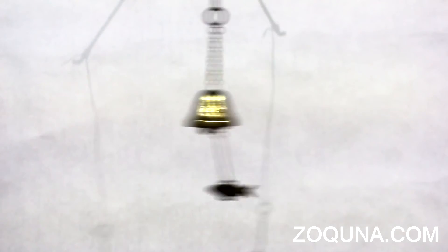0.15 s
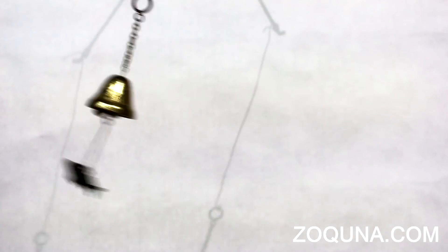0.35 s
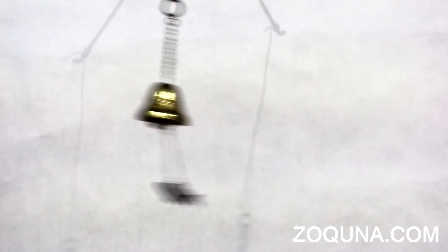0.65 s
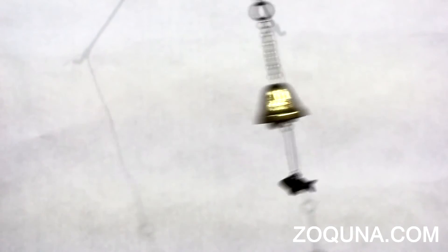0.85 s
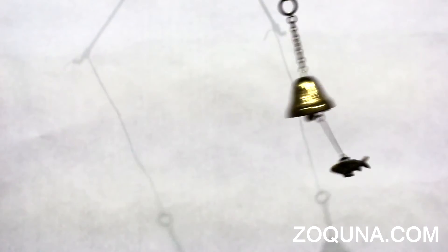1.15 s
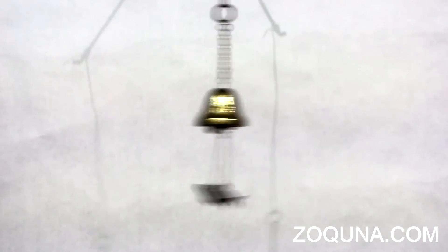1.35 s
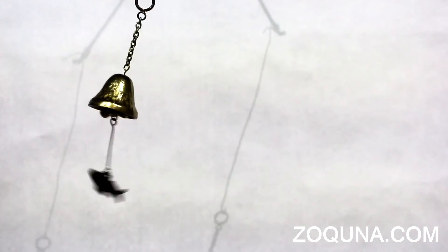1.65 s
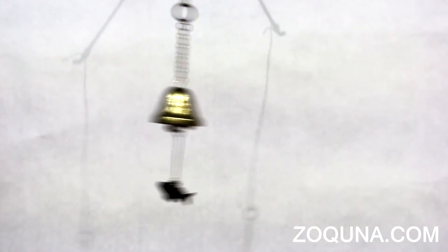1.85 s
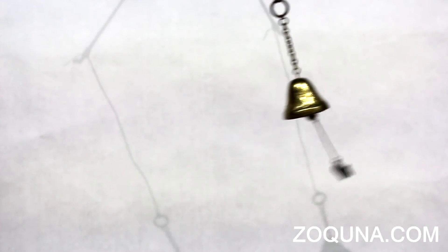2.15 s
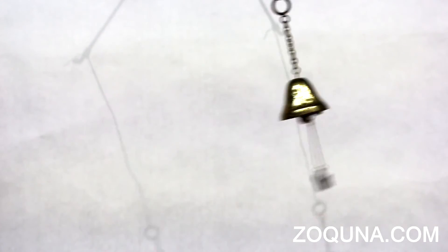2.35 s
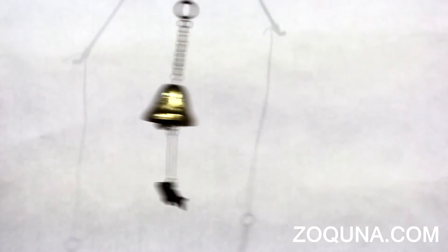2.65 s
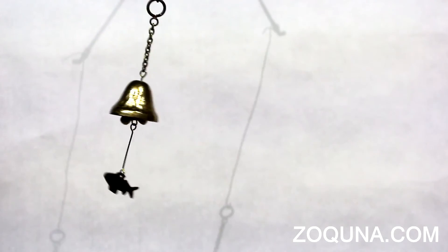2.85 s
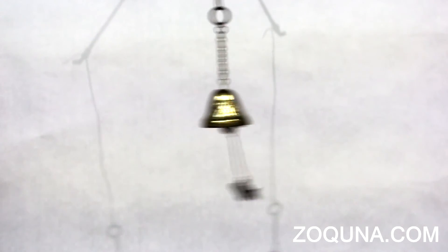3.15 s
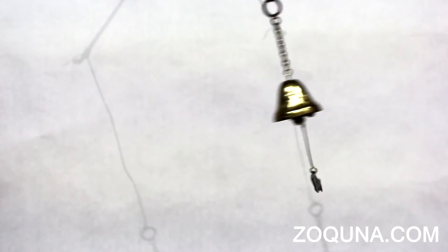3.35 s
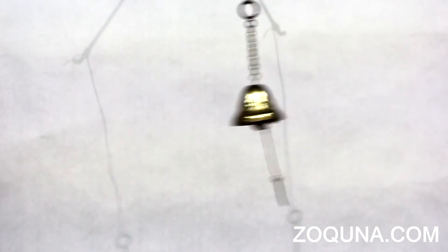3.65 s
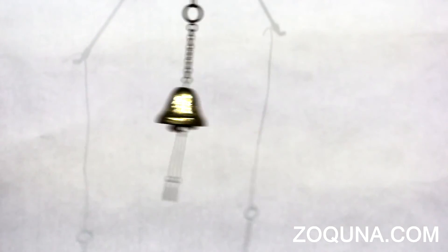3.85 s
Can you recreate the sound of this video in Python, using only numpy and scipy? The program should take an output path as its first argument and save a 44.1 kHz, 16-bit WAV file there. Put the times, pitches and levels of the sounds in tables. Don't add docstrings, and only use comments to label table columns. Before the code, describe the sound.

A little hanging bell is struck repeatedly, its thin high ring wavering over soft hiss

```python
import sys
import numpy as np
from scipy import signal
from scipy.fft import rfft, irfft, next_fast_len
from scipy.io import wavfile
from scipy.ndimage import uniform_filter1d, map_coordinates

SR = 44100
rng = np.random.default_rng(int(sys.argv[2]) if len(sys.argv) > 2 else 0)


def undo_db(level):
    steps = np.asarray(level, float) / 20
    return 10 ** steps


def generate_wav(sig):
    pcm = np.round(np.clip(np.atleast_2d(sig).T, -1, 1) * 32767).astype(np.int16)
    wavfile.write(sys.argv[1], SR, pcm)


N = 176400

# (time [s], low tone [dB], high tone [dB], low overtone [dB], high overtone [dB])
BLOWS = [
    (-.02, -17, -24, -38.5, -44.5),
    (0.7533, -21, -30, -27.5, -29),
    (1.249, -31, -34, -39, -39),
    (2.2723, -65.5, -36, -72, -58),
    (3.2837, -45.5, -53, -71, -68),
]


def unit(x):
    return x / np.sqrt(np.mean(x ** 2) + 1e-20)


def along(points, hz):
    f, v = np.transpose(points)
    return np.interp(np.log(hz + 1), np.log(f + 1), v)


def filtered(x, response):
    m = next_fast_len(N + SR // 2)
    spectrum = rfft(x, m) * response(np.fft.rfftfreq(m, 1 / SR))
    return irfft(spectrum, m)[..., :N]


def closed(points):
    return lambda hz: undo_db(along(points, hz)) / (1 + (points[0][0] / (hz + 1)) ** 14)


def resonance(center, width):
    return lambda f: (1j * f * width / (center * center - f * f + 1j * f * width)) ** 2


def noise(response):
    # (frequency [Hz], share [0-1])
    side_share = [(60, .06), (180, 0.24), (350, 0.47), (700, 0.72), (3000, 0.51), (14000, 0.67)]

    def mid_side(hz):
        share = np.clip(along(side_share, hz), 0, 1)
        return response(hz) * np.sqrt([1 - share, share])

    mid, side = filtered(rng.standard_normal((2, N)), mid_side)
    return unit(np.array([mid + side, mid - side]))


def wobble(rate):
    knots = rng.standard_normal(int(N * rate / SR) + 4)
    return map_coordinates(knots, [np.arange(N) * rate / SR])


def room():
    # (frequency [Hz], level [dB])
    air_curve = [(21, -32), (35, -8.5), (76, -7.5), (108, -4.5), (280, -7.5), (600, -12.5), (780, -55),
                 (1320, -120)]
    # (frequency [Hz], level [dB])
    hiss_curve = [(400, -12), (600, 1.5), (1500, -3.5), (3300, -4.5), (4500, -9), (8000, -12.5),
                  (12000, -17), (15800, -22)]
    # (frequency [Hz], width [Hz], level [dB])
    hums = [
        (44, 10, -65.5),
        (65.7, 9.9, -62.5),
        (277.55, 6.9, -63.5),
    ]
    # (frequency [Hz], level [dB])
    right_db = [(40, -1.5), (2000, 0), (14000, 0.3)]

    air = noise(lambda hz: closed(air_curve)(hz) / (1 + (hz / 600) ** 8))
    hiss = noise(closed(hiss_curve))
    bed = undo_db(-57.5 + wobble(7.5)) * air + undo_db(-55.5 + 0.29 * wobble(12)) * hiss
    for hz, width, db in hums:
        bed += undo_db(db) * noise(resonance(hz, width))
    return filtered(bed, lambda hz: undo_db(np.outer([-.5, .5], along(right_db, hz))))


def stand():
    # (time [s], rise [s], t60 [s], rustle [dB], knock [dB])
    scuffs = [(.17, .05, .5, -58.5, -74), (1.701, 0.013, .15, -51.5, -71.5), (1.86, .09, 0.43, -42.5, -62),
              (1.985, .012, .25, -48, -68), (2.019, 0.056, 0.39, -49, -69.5),
              (2.553, 0.026, 0.41, -39.5, -45), (2.84, 0.074, 0.81, -51.5, -65),
              (2.89, 0.032, 0.76, -58, -54.5), (3.698, 0.0096, 0.28, -46.5, -67)]
    # (frequency [Hz], level [dB])
    rustle_curve = [(400, -7.5), (1400, -6.5), (2800, -3.5), (3500, 2.5), (4500, -11.5), (7000, -25.5),
                    (13000, -32)]
    # (frequency [Hz], width [Hz], level [dB])
    hollows = [(159, 180, -5.5), (299, 17, -13), (418.6, 81, -3.5)]
    # (time [s], length [s], frequency [Hz], width [Hz], level [dB])
    squeaks = [
        (2.3, .33, 3230, 110, -54.5),
        (3.7, .04, 3400, 400, -53),
    ]
    # (time [s], length [s], frequency [Hz], level [dB])
    creaks = [
        (-.01, 0.081, 1592, -59.5),
        (.8, .08, 1550, -64.5),
    ]

    t, out = np.arange(N) / SR, np.zeros((2, N))
    grain = undo_db(0.63 * wobble(300) + .6 * wobble(33))
    rustle = unit(noise(closed(rustle_curve)) * grain)
    knock = np.zeros((2, N))
    for hz, width, db in hollows:
        drift = np.array([wobble(width), wobble(width)])
        knock += undo_db(db) * np.sin(2 * np.pi * hz * t + drift)
    knock = unit(knock)

    for s, rise, t60, rustle_db, knock_db in scuffs:
        u = np.maximum(t - s, 0)
        shape = np.minimum(u / rise, 1) ** 2 * undo_db(-60 * np.maximum(u - rise, 0) / t60)
        out += shape * (undo_db(rustle_db) * rustle + undo_db(knock_db) * knock)
    for s, length, hz, width, db in squeaks:
        shape = np.clip(np.minimum(t - s, s + length - t) / 0.005, 0, 1)
        out += shape * undo_db(db + 3.5 * wobble(60)) * noise(resonance(hz, width))
    for s, length, hz, db in creaks:
        shape = np.clip(np.minimum(t - s, s + length - t) / .015, 0, 1)
        out += shape * undo_db(db + 1.5 * wobble(30)) * np.sin(2 * np.pi * hz * t + .4 * wobble(30))
    return out


def clapper():
    # (click [dB], bright edge [dB], top modes [dB])
    clicks = [
        (-31.5, -37, -24.5),
        (-34.5, -48.5, -59),
        (-42.5, -61, -66),
        (-47, -67, -72),
    ]
    # (frequency [Hz], level [dB], t60 [s])
    top_modes = [(10310, -3, 0.048), (11300, -19, .06), (14725, -26, 0.13), (15510, -27, .17)]
    # (frequency [Hz], level [dB])
    click_curve = [(1700, -18), (2400, -6.5), (3300, -4.5), (4100, 0.5), (5000, -14), (7000, -45)]
    # (frequency [Hz], level [dB])
    edge_curve = [(5000, -6.5), (7500, 1), (9500, 0), (12500, -14), (15500, -30)]
    click_t60_s, room_t60_s, room_db = .012, 0.16, -11
    rebound_s, rebound_db = .0042, -2

    t, out = np.arange(N) / SR, np.zeros((2, N))
    for (s, *_), (click_db, edge_db, top_db) in zip(BLOWS[1:], clicks):
        u = np.maximum(t - s, 0)
        tick = undo_db(-60 * u / click_t60_s)
        tick += (u > rebound_s) * undo_db(rebound_db - 60 * abs(u - rebound_s) / click_t60_s)
        tick += undo_db(room_db - 60 * u / room_t60_s)
        click = undo_db(click_db) * noise(closed(click_curve)) + undo_db(edge_db) * noise(closed(edge_curve))
        ring = np.zeros((2, N))
        for hz, db, t60 in top_modes:
            ring += undo_db(db - 60 * u / t60) * np.sin(2 * np.pi * (hz * u + rng.random((2, 1))))
        onset = 1 - np.exp(-u / 0.00073)
        out += (t > s) * (tick * click + undo_db(top_db) * ring * onset)
    return out


def lobes(nodes, t):
    inertia_s, squareness = .04, 0.79
    s, *cols = np.transpose(nodes)

    def glide(values):
        return uniform_filter1d(np.interp(t, s, values), round(inertia_s * SR))

    swing = np.tanh(squareness * np.sin(np.pi * glide(np.arange(len(s))))) / np.tanh(squareness)
    lobe = np.searchsorted(s[1:-1], t)
    size = undo_db([uniform_filter1d(db[lobe], round(2 * inertia_s * SR)) for db in cols[:2]])
    fill = 0.47
    if len(cols) > 2:
        fill = np.array([glide(c) for c in cols[2:]])
    return size * (swing + 1j * fill * (1 - swing ** 2))


def bell():
    # (frequency [Hz], t60 [s])
    modes = [
        (3967, 2.83),
        (3997, 1.997),
        (9026, 0.96),
        (9060, 0.98),
    ]
    # (time [s], next lobe left
    # [dB], right [dB], room fill left [0-1], right [0-1])
    nodes_low = [(-0.08, -5, -15, 0.2, 0.7), (0.05, -2, -0.5, 1, 0.08), (0.209, 1, -8.5, 0.19, 0),
                 (0.43, 1, -8, 0.4, 0), (0.651, 1.5, 6.0, 0.68, 0), (0.799, 4, 6.5, 0.14, 0.42),
                 (0.909, 4, -1.5, 0.1, 1), (1.066, -28, 1, 0.6, 0), (1.207, 6.5, 5.5, 1, 0.5),
                 (1.341, 4, 9.5, 0.38, 0.47), (1.492, -4.5, 4, 0.4, 0.46), (1.632, 0, -6.5, 0.26, 0.8),
                 (1.782, 6.5, 11, 0.15, 0.8), (1.959, 7, 7.5, 0.74, 0.3), (2.073, 10.5, 12.5, 0, 0),
                 (2.272, 7, 12, 1, 0.8), (2.7, 4, 25.5, 0.1, 0.05), (3.285, 5.5, -8, 0.8, 0.8),
                 (3.39, 5.5, 9, 0.3, 0.9), (3.75, 6.5, -14, 1, 0.3), (4.0, 0.0, 0.0, 0.57, 0.05)]
    nodes_high = [(-0.05, -2, 3, 0.3, 0.3), (0.06, 7, -4, 0.21, 0.6), (0.172, 3.5, 7.5, 0.67, 0.31),
                  (0.33, 7.5, 12.5, 0.31, 0.41), (0.7, 4.5, -7.5, 0.27, 0.54), (0.86, -1, 8, 0.81, 0.29),
                  (1.05, 3, 5, 0.09, 0.14), (1.249, 1, -4.0, 0.66, 0.56), (1.41, 3.0, -1.5, 1, 0.27),
                  (1.608, -8, 6, 0.05, 0.26), (1.85, 2, 13, 1, 1), (2.13, -9, -26, 0.18, 0.19),
                  (2.276, 4.5, 6.5, 0.26, 0.19), (2.523, -2, -0.5, 0.16, 1), (2.637, 7, 12.5, 0.58, 0.059),
                  (2.95, 1, 14, 0.45, 0.98), (3.285, -3, 12.5, 1, 0.4), (3.7, 5, 18, 0.85, 0.68),
                  (3.85, 20.5, 10, 0.12, 0.28), (4.1, 0.0, 0.0, 0.3, 0.3)]
    # (time [s], next lobe left [dB], right [dB])
    nodes_over_low = [(-0.05, -26, 3.5), (0.05, -6.5, 4.5), (0.15, 0.5, 6), (0.258, -13, -0.5),
                      (0.399, -13, -19), (0.74, 3.5, 4.5), (0.818, -14.5, 1), (0.932, 6, -2.5),
                      (1.03, 4.5, 4), (1.24, 0.5, -6), (1.352, -8, -3.5), (1.45, -5.5, -1.5),
                      (1.55, -15, -27), (1.8, 0.0, 0.0)]
    nodes_over_high = [(-0.05, 1, -5), (0.101, -11, -6.5), (0.199, 1.5, -2.5), (0.74, 1, -5.5),
                       (0.86, -5, -18), (1.001, -9.5, -7.5), (1.11, -14, -27), (1.24, -3, -22),
                       (1.328, -4.5, 0.5), (1.41, -19, -12), (1.5, 0, 4.0), (1.63, -2, -13), (2.26, -6, -8),
                       (2.33, 5, -2), (2.48, 6, 6), (3.27, 4, 9.5), (3.4, -10, -7), (3.6, 0, 0)]
    all_nodes = [nodes_low, nodes_high, nodes_over_low, nodes_over_high]
    rise_s, port_lag_rad = 0.0032, 0.49

    t, out = np.arange(N) / SR, np.zeros((2, N))
    s, *levels = np.transpose(BLOWS)
    last = np.searchsorted(s, t, "right") - 1
    lag = np.exp(1j * port_lag_rad * np.array([[.5], [-.5]]))
    for (hz, t60), db, nodes in zip(modes, levels, all_nodes):
        phase = np.exp(2j * np.pi * rng.random(len(s)))
        state = undo_db(db[last] - 60 * (t - s[last]) / t60) * phase[last]
        hold = np.exp(-hz / modes[0][0] / (rise_s * SR))
        state = signal.lfilter([1 - hold], [1, -hold], state, zi=[state[0] * hold])[0]
        out += np.imag(state * lobes(nodes, t) * lag * np.exp(2j * np.pi * hz * t))
    return out


def scene():
    return room() + stand() + clapper() + bell()


def masked(x):
    # (frequency [Hz], threshold under the tone [dB], slope [dB per kHz])
    masks = [
        (3980, -33, -11),
        (9040, -30, -6),
    ]
    hz, _, z = signal.stft(x, SR, nperseg=1024)
    level = np.sqrt(uniform_filter1d(abs(z) ** 2, size=8, axis=1) + 1e-20)
    for tone_hz, under_db, slope_db in masks:
        tone = abs(z[:, abs(hz - tone_hz) < 100]).max(axis=1, keepdims=True)
        above = (hz - tone_hz)[:, None]
        audible = level > tone * undo_db(under_db + slope_db * above / 1000)
        z = z * (audible | (above < 250))
    return signal.istft(z, SR, nperseg=1024)[1][:, :N]


def band_limit(x):
    return signal.sosfilt(signal.butter(12, 15820, fs=SR, output="sos"), x)


def record(dry):
    band = filtered(dry, lambda hz: hz < 15760)
    return band_limit(masked(band))


dry = scene()
out = record(dry)
generate_wav(out)
```